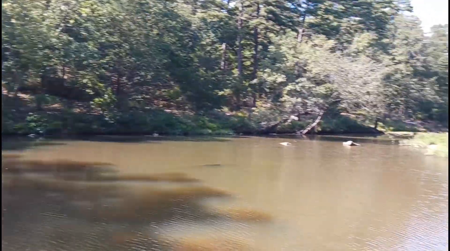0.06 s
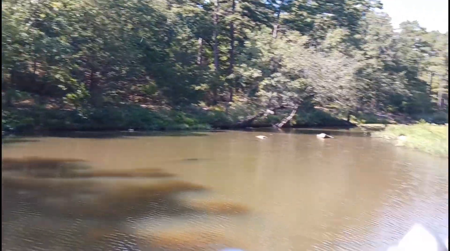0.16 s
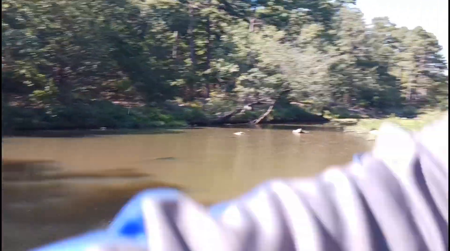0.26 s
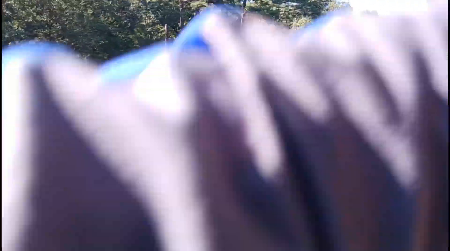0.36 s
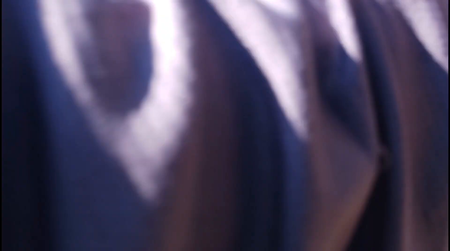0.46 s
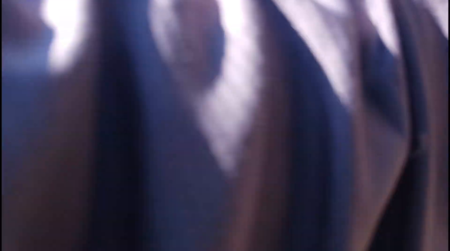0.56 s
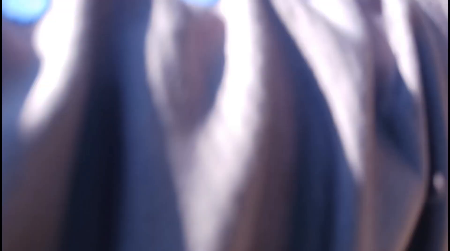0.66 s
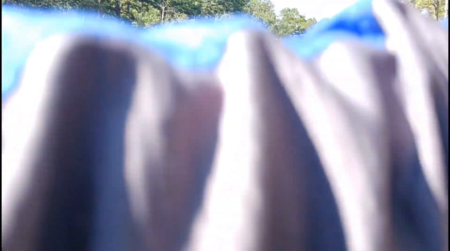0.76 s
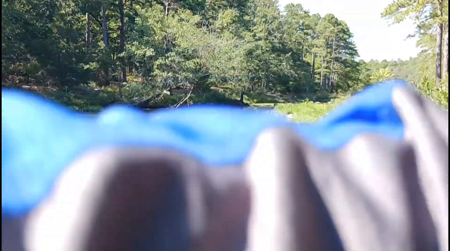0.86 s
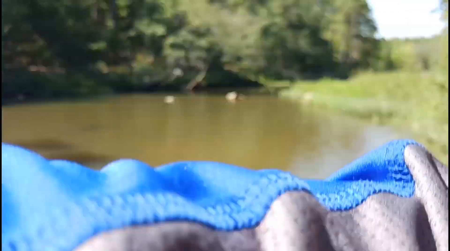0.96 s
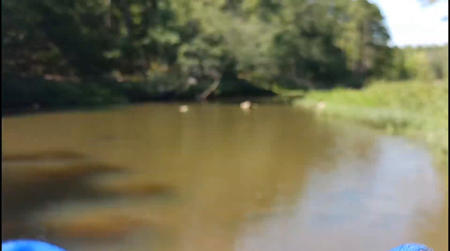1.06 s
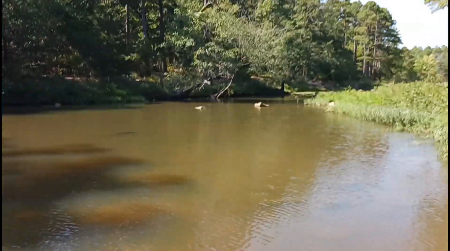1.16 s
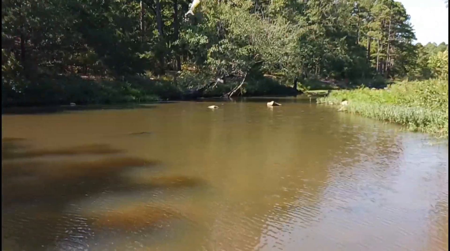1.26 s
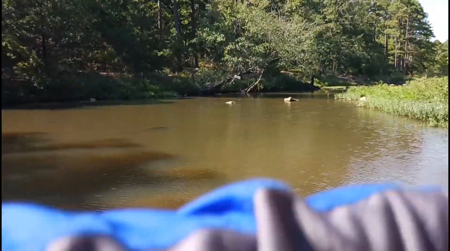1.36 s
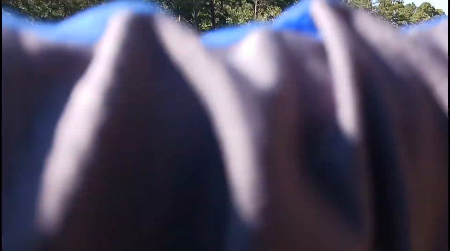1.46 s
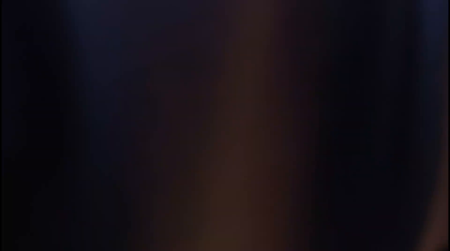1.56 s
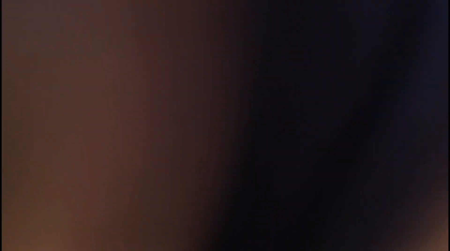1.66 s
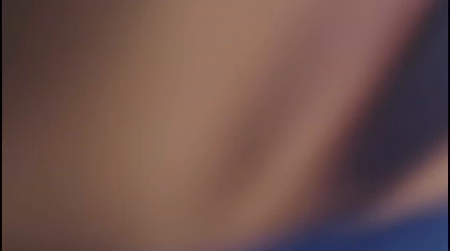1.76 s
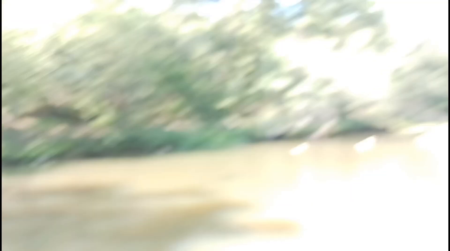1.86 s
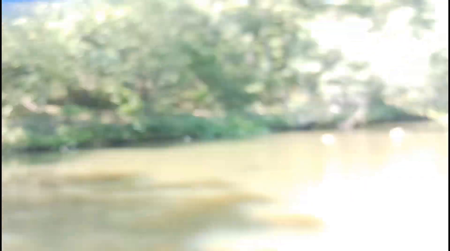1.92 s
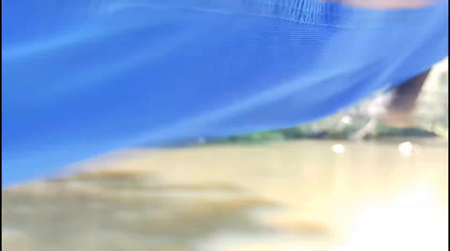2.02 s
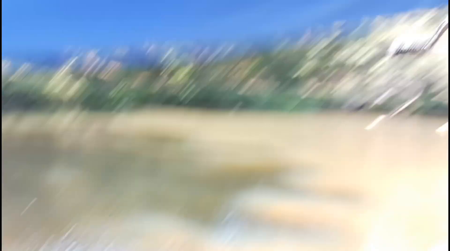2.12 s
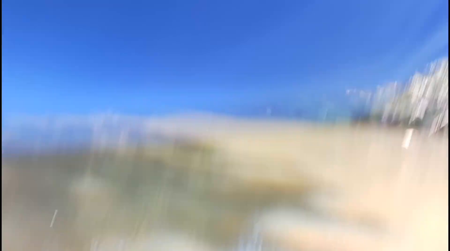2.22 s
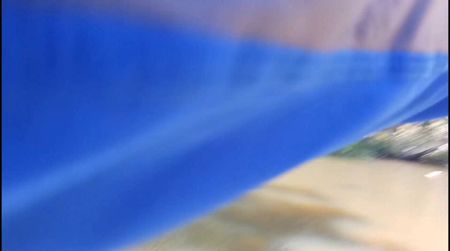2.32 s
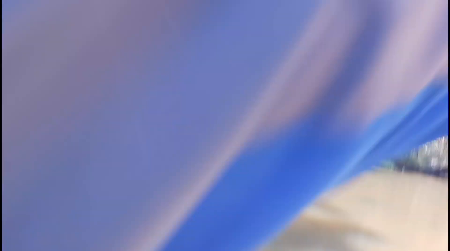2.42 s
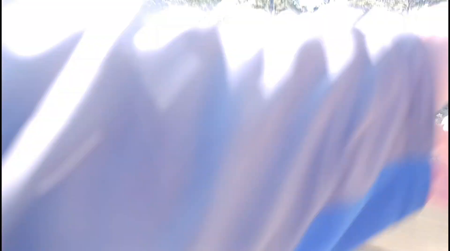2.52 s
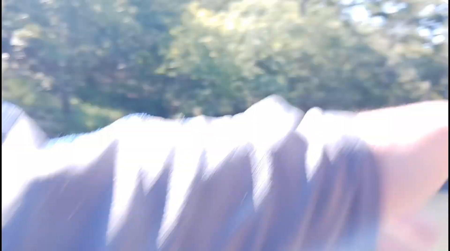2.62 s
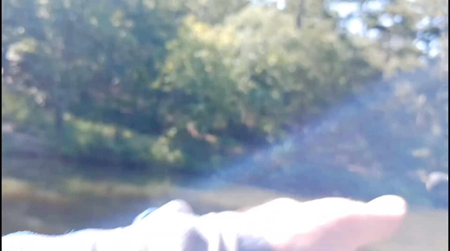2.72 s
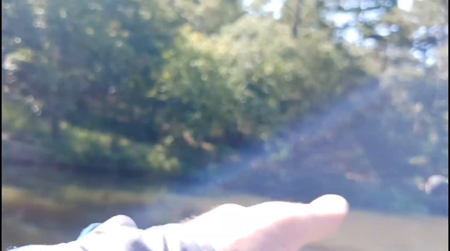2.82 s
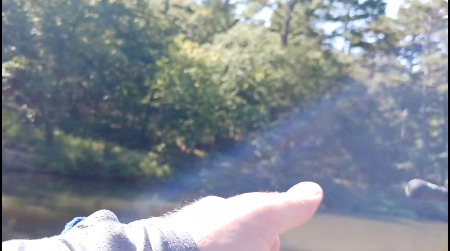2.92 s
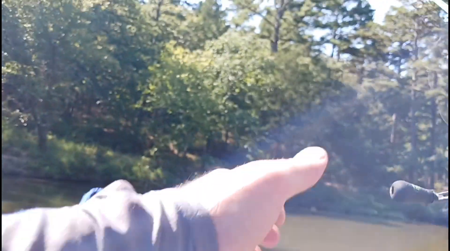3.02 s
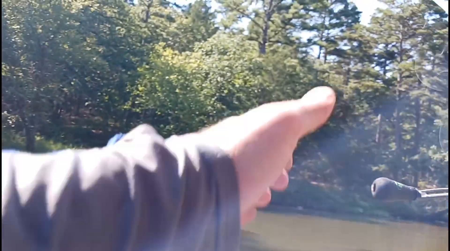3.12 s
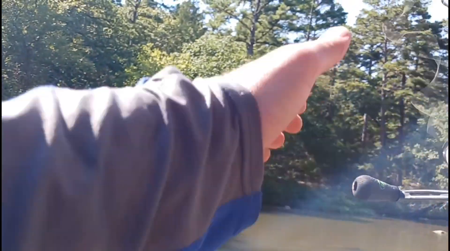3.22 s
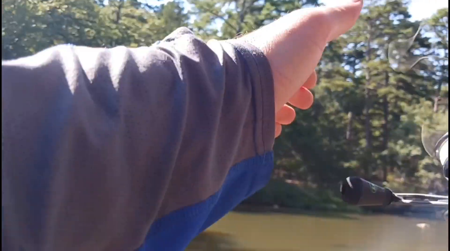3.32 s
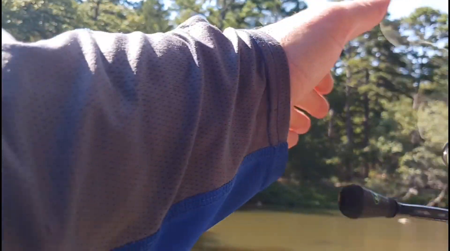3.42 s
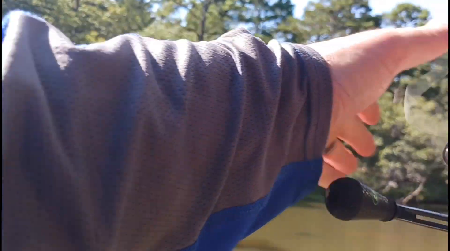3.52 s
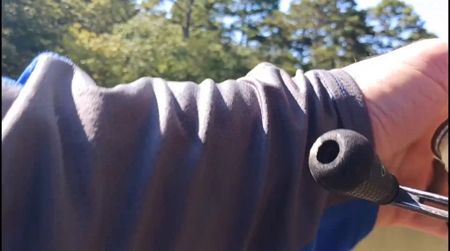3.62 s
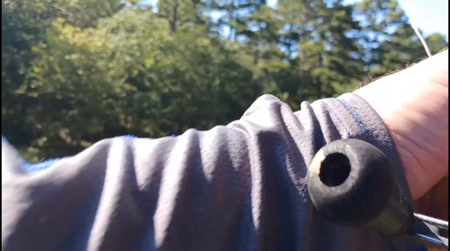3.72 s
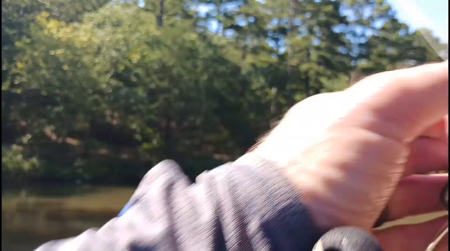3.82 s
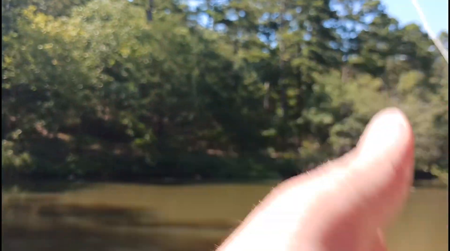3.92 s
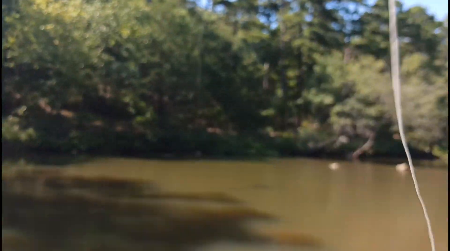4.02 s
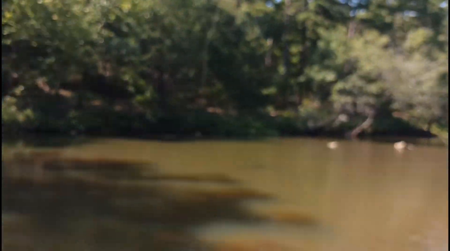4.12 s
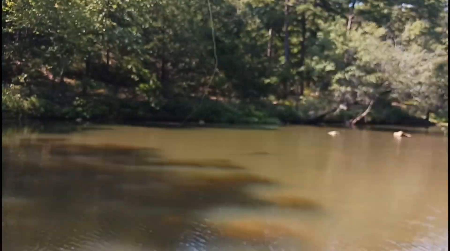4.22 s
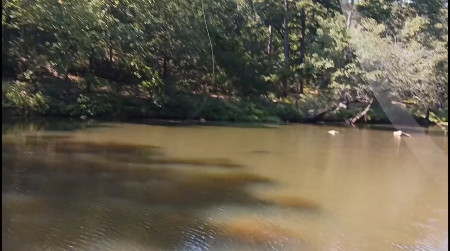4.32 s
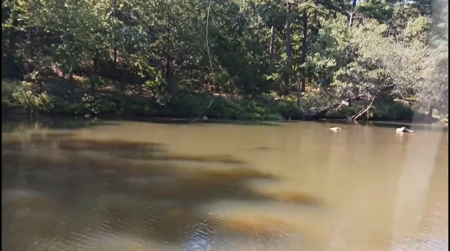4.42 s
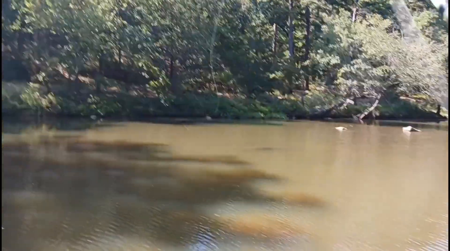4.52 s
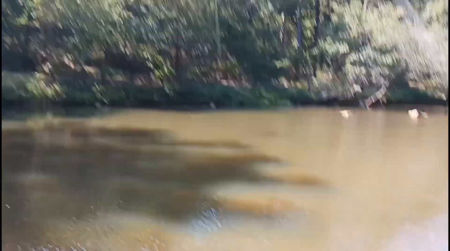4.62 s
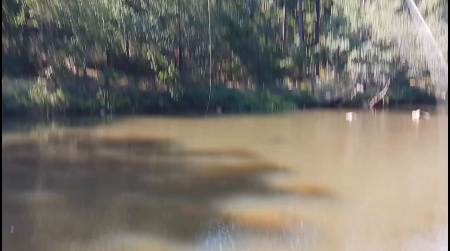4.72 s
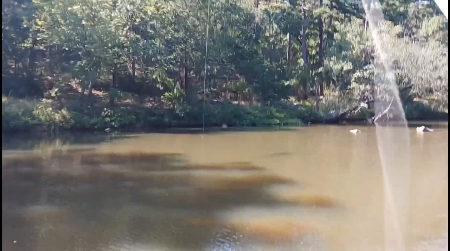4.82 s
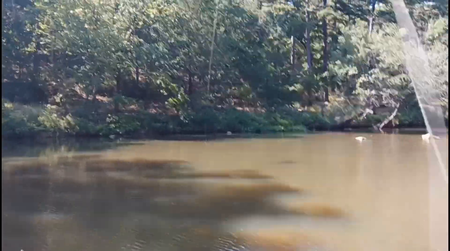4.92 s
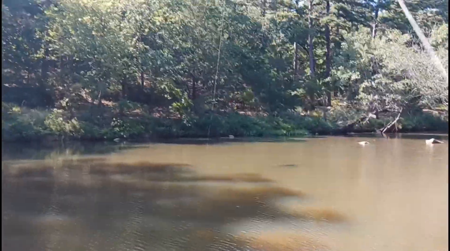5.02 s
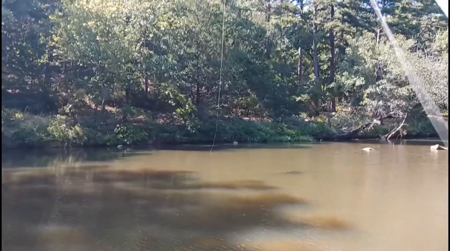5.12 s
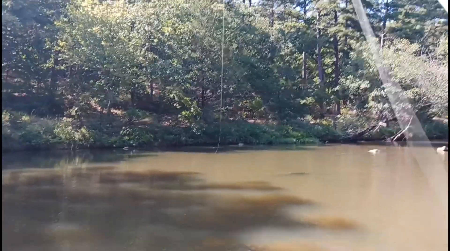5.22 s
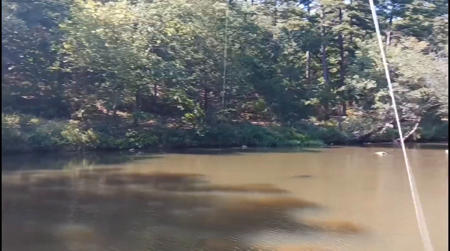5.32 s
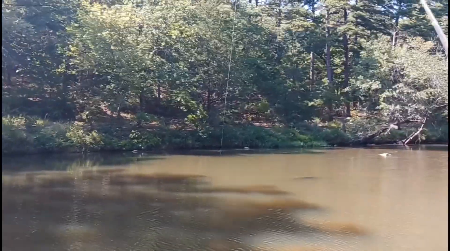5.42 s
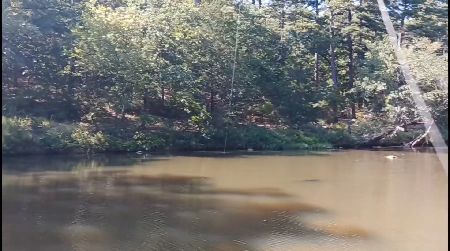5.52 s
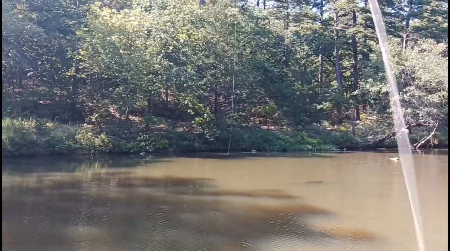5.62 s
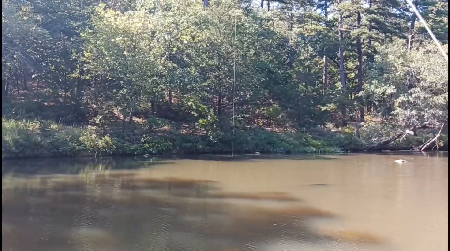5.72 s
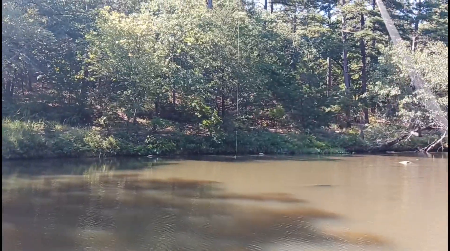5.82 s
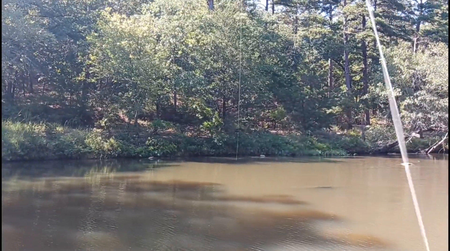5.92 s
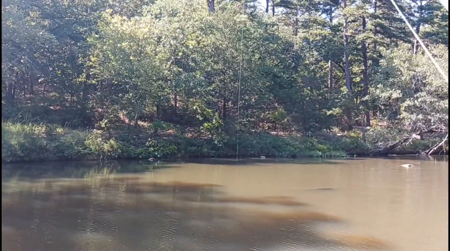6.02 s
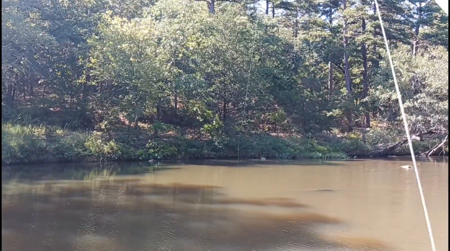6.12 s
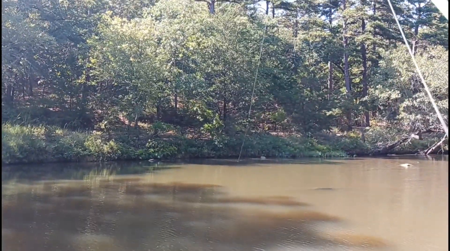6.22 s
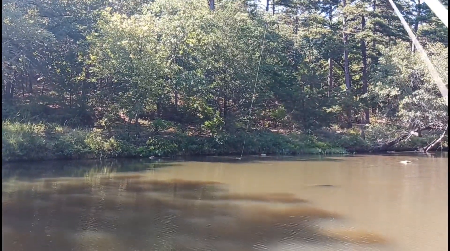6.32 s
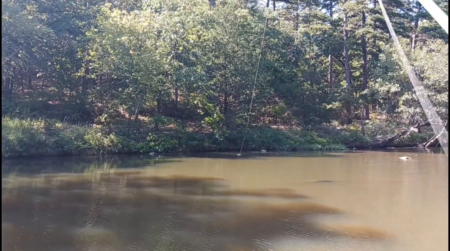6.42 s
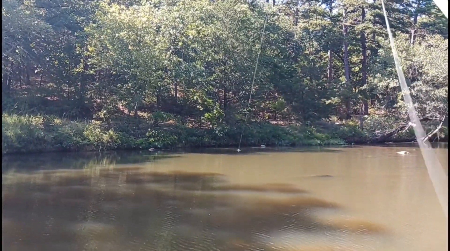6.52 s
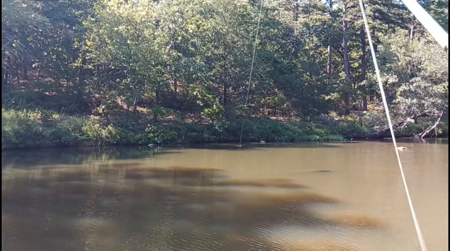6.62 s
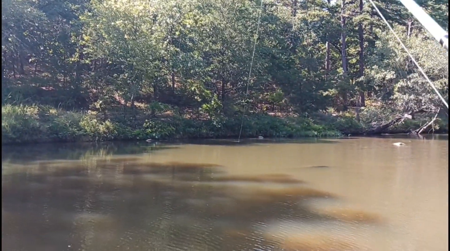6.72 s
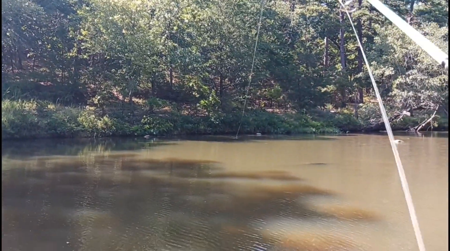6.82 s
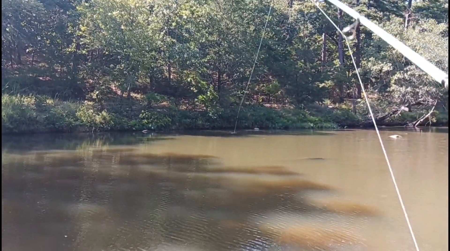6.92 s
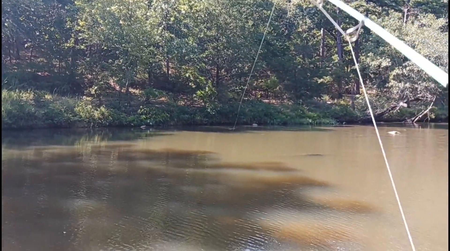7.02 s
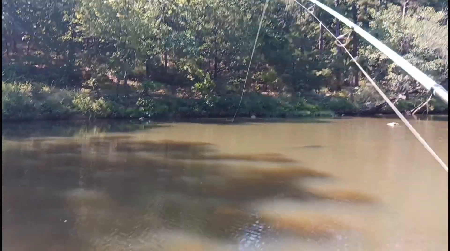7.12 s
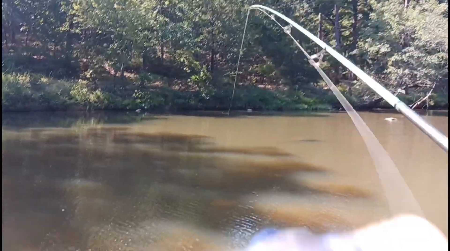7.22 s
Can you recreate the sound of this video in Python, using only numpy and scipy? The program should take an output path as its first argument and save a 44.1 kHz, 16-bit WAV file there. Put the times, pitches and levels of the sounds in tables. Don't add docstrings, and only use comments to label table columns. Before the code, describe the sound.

Very close, dry handling of a spinning rod: sharp metal clicks, a pause, a hard clack on the right, then a heavy sleeve rub on the left. The cast follows with low gusts, clattering line and ringing knocks, settling into airy hiss with a faint falling whistle. A crisp bail snap ends it; soft gear whirr, fabric rustle and irregular ticks continue over barely audible creek noise.

```python
import sys
import numpy as np
from scipy import signal
from scipy.fft import rfft, irfft, next_fast_len
from scipy.io import wavfile
from scipy.ndimage import uniform_filter1d, map_coordinates

SR = 44100
rng = np.random.default_rng(int(sys.argv[2]) if len(sys.argv) > 2 else 0)


def amplitude_ratio(level_db):
    exponent = np.asarray(level_db, float) / 20
    return 10 ** exponent


def master(y):
    cut = np.clip(np.atleast_2d(y).T, -1, 1)
    pcm = np.round(cut * 32767)
    wavfile.write(sys.argv[1], SR, pcm.astype(np.int16))


N = 320323

# frequency in Hz, density in dB per Hz.
CREEK_SPECTRUM = [(59, -28), (100, -14.5), (433, -20.5), (481, -17.5), (930, -25), (1280, -30),
                  (1610, -34.5), (10200, -26.5), (11900, -22), (16000, -25.5)]
CREEK_DB = -72

# frequency in Hz, density in dB per Hz.
WIND_SPECTRUM = [(12, -42.5), (20, -7.5), (70, 2.5), (95, -2), (197, -22), (500, -35.5), (650, -65.5),
                 (1100, -120)]
# time in s, peak in dB, rise in ms, fall in ms (each for 20 dB).
GUSTS = [(0.066, -56, 240, 202), (0.591, -66, 630, 261), (1.177, -49.5, 100, 60), (1.25, -62.5, 330, 502),
         (1.719, -33, 30, 300.5), (1.776, -26, 60, 123), (2.168, -24.5, 13.8, 37), (2.256, -35.5, 73, 46.5),
         (2.365, -37.5, 72, 50), (2.49, -34.5, 64, 122.5), (2.754, -56.5, 190, 1508), (3.105, -43, 88, 298),
         (3.165, -39, 200, 26), (3.312, -45, 51, 174), (3.569, -43.5, 37, 397), (3.718, -36.5, 160, 86.5),
         (3.95, -63, 100, 226.5), (4.16, -36, 89, 56), (4.279, -49.5, 39, 62), (4.484, -38, 47.3, 45),
         (4.597, -47, 39, 141.5), (4.816, -45, 150, 73), (5.108, -61.5, 85, 392)]
CALM_DB = -70.5

# frequency in Hz, density in dB per Hz.
RUSTLE_SPECTRUM = [(120, -31.5), (200, -18), (409, -10.5), (1230, -12.5), (2330, -10), (2800, -12),
                   (3560, -7), (9930, -11), (14900, -9), (16000, -22.5)]
# time in s, peak in dB, rise in ms, fall in ms, left over right in dB.
FABRIC_RUBS = [(0.1, -61, 230, 420, 0.5), (0.29, -61.5, 80, 82, -2), (0.446, -62.5, 90, 300, 5),
               (0.862, -52.5, 123, 93, -3.5), (0.95, -76, 150, 970, -0.5), (1.1, -60, 220, 293, -4),
               (1.3, -79, 340, 140, 7), (1.66, -64, 190, 170, 14.5), (3.775, -58.5, 27, 230, -0.5),
               (3.968, -43, 24, 26.4, 0.5), (4.17, -60, 490, 300, 1.5), (4.314, -50.5, 160, 147, -1.5),
               (4.586, -56.5, 89, 1600, -2.5), (4.889, -51.5, 590, 218, 2), (5.432, -62, 1600, 353, 1),
               (5.879, -65.5, 1100, 230, -0.5), (6.23, -65, 1600, 270, -3), (6.666, -52, 148, 200, 0.2),
               (6.55, -58.5, 270, 180, -1.5), (6.804, -65.5, 150, 270, 4), (7.032, -67, 189, 35, -3),
               (7.25, -54.5, 69, 65, -2)]
STILL_DB = -79
GRIP_DB, GRIP_LEAD, GRIP_FALL_MS, GRIP_PAN = -21.5, 1.514, 16.5, 0.35

# time in s, pressure as rumble in dB, speed as scratch in dB.
SLEEVE_DRAG = [
    (1.692, -42, -63),
    (1.707, -21, -30.5),
    (1.763, -17, -31.5),
    (1.779, -24.5, -24),
    (1.796, -42.5, -48),
    (1.834, -29, -45.5),
    (1.854, -26.5, -33.5),
    (1.869, -22, -25.5),
    (1.93, -56, -62),
]
# frequency in Hz, density in dB per Hz.
RUMBLE_SPECTRUM = [(35, -35), (60, -6.5), (268, -4.5), (525, -8.5), (826, -15), (2500, -27.5), (3250, -46),
                   (5500, -120)]
# frequency in Hz, density in dB per Hz.
SCRATCH_SPECTRUM = [(880, -31), (1500, -3.5), (3450, -5), (6500, -10), (12600, -9.5), (16000, -9.5)]
FAR_S, FAR_HOLD_S, FAR_EDGE_S, FAR_DB = 1.782, 0.072, 0.03, -65.5

# time in s, peak in dB, frequency in Hz, 60 dB decay in s, left over right in dB.
KNOCKS_AND_BLOWS = [(0.4462, -39, 3450, 0.022, -2), (0.452, -44, 3400, 0.019, -2), (1.117, -35.5, 245, 0.0193, -0.5),
                    (1.1207, -8.5, 464, 0.0043, -23), (1.124, -29, 189, 0.0307, -21.5), (1.55, -51, 910, 0.0076, 6.5),
                    (2.162, -28.5, 130, 0.042, 25), (2.1701, -22.5, 64.6, 0.13, 27), (2.349, -36, 179, 0.05, 27),
                    (2.4317, -18, 4550, .02, 4), (2.4473, -23.5, 2356, 0.039, 7), (2.462, -31.5, 60.5, 0.11, 22.5),
                    (4.579, -36, 224, 0.023, 2), (5.095, -40.5, 220.3, 0.023, 3.5)]

# time in s, peak in dB, rise in ms, fall in ms.
CRANK_PUSHES = [(4.8, -58, 153, 253), (4.91, -54, 270, 120), (5.06, -60, 100, 380),
                (5.311, -59.5, 250, 1270), (5.751, -63, 153, 380), (6.197, -65.5, 480, 302),
                (6.489, -61.5, 94, 350), (6.686, -55, 97, 210), (6.815, -57, 360, 110),
                (6.968, -62, 120, 53), (7.26, -49.5, 39, 44)]
# frequency in Hz, width in Hz, level in dB.
GEARBOX_MODES = [(743, 80, -15), (2270, 130, -1.5), (2525, 380, -5.5), (3430, 320, -5.5), (3060, 2000, -2)]
# time in s, frequency in Hz, level in dB.
SHELL_MODE = [(4.55, 1700, -9), (4.79, 1920, 2.5), (4.83, 1583, 3.5), (4.9, 1624, -2), (4.95, 1930, 5.5),
              (5.03, 1618, 2.5), (5.2, 1655, -5.5), (7.0, 1687, -7), (7.2, 1864, 1.5)]
# time in s, peak in dB, rise in ms, fall in ms.
CORK_SQUEEZES = [
    (4.82, -79.5, 73, 74),
    (6.54, -67, 140, 190),
    (6.7, -74, 200, 160),
]
CORK_HZ, THROB_DB = 402, 2.5

# time in s, speed as hiss in dB, slack as guide rattle in dB.
PAYOUT = [
    (1.93, -65.5, -65.5),
    (2.1, -59.5, -49),
    (2.12, -45.5, -43.5),
    (2.4, -47.5, -42.5),
    (2.71, -50, -53),
    (2.9, -51.5, -65.5),
    (3.44, -51, -65.5),
    (3.63, -52.5, -57),
    (3.77, -72.5, -58.5),
]
# time in s, peak in dB, rise in ms, fall in ms, left over right in dB.
LOOP_SLAPS = [
    (2.123, -44.5, 40, 23.6, 8),
    (2.152, -31.5, 36, 32, 1),
    (2.408, -43, 67, 52, 23),
    (2.443, -30, 18, 32, 4),
    (3.471, -51.5, 36, 158, -1.5),
]
SLAP_HISS_DB, SPOOL_PAN_DB = -17, 1.5
# time in s, frequency in Hz, level in dB.
COIL_WHISTLE = [(2.9, 8700, -72), (3.0, 8400, -63), (3.17, 7900, -61), (3.35, 7000, -68), (3.5, 5600, -72),
                (3.6, 4500, -63), (3.66, 3800, -64), (3.72, 3400, -72)]
# frequency in Hz, width in Hz, level in dB.
SPOOL_MODES = [(4670, 300, -8), (5680, 60, 5), (8580, 90, -7), (12300, 150, -2), (13300, 300, -6)]
# frequency in Hz, density in dB per Hz.
HISS_SPECTRUM = [(880, -67), (1500, -57), (2250, -17), (3030, -25.5), (3590, -17), (8320, -4), (9370, -8.5),
                 (12700, 0.5), (16000, -6)]
# frequency in Hz, density in dB per Hz.
RATTLE_SPECTRUM = [(180, -23.5), (300, -8), (900, -12.5), (1730, -8.5), (2250, -8), (2800, -12.5),
                   (3570, -2.5), (5200, -3.5), (9000, -16.5), (11700, -59), (19800, -120)]

# frequency in Hz, width in Hz, level in dB.
BODY_MODES = [(1812, 42, 7.5), (2370, 220, 5.5), (3541, 80, 6.5), (4480, 58, -19), (5650, 110, 2)]
# time in s, peak in dB, frequency in Hz, left over right in dB.
SETTING = [(0.1339, -20, 7060, 1), (0.1391, -18, 12100, -12), (0.1471, -25.5, 12600, -3),
           (0.1529, -44.5, 12600, -0.5), (0.1657, -31.5, 7260, -14), (0.2402, -32.5, 7100, -13),
           (0.2496, -36.5, 7400, -11), (0.2575, -33.5, 5440, -1.5), (0.3282, -41.5, 3710, -23),
           (0.3317, -33.5, 11500, -8.0), (0.339, -38, 4830, -11.5), (0.3704, -27.5, 3430, -1),
           (0.4467, -36.5, 3460, -2), (0.4523, -43, 3420, -10), (1.118, -30, 4470, -24.5),
           (1.1219, -21.5, 4870, -19.5), (1.1369, -23.5, 2850, -16.0), (1.1463, -16.5, 4245, -17),
           (1.162, -32, 4084, -14), (1.4411, -56, 11900, 14), (1.622, -48, 6990, 0.5),
           (1.763, -20, 2660, 19)]
# time in s, peak in dB, frequency in Hz, left over right in dB.
FLYING = [(2.1162, -29, 5800, 1), (2.1413, -23.5, 4510, -4), (2.1479, -25.5, 2390, 5.5),
          (2.1579, -28, 4660, 1), (2.1987, -33, 4630, -3.5), (2.2438, -30, 3760, -4),
          (2.2534, -31.5, 3460, -6), (2.2951, -31.5, 4430, -8), (2.3079, -33.5, 4380, 0),
          (2.324, -33, 3460, 2), (2.3491, -32, 4520, 0), (2.355, -25.5, 4140, -8),
          (2.4006, -25.5, 4530, -2.5), (2.4321, -19, 4670, 1), (2.4358, -18, 4660, -2),
          (2.4402, -15, 4430, -3.5), (2.4483, -20.5, 2288, 1.5), (2.7473, -39, 11020, 1),
          (3.2275, -42, 12300, 3.5), (3.464, -32, 6250, 3.5), (3.4773, -39, 8600, 10),
          (3.5677, -40, 12500, 3.5)]
# time in s, peak in dB, frequency in Hz, left over right in dB.
CLOSING = [(3.7653, -44, 12400, -1), (3.7834, -47, 3930, -11), (3.8003, -46, 4700, -2.5),
           (3.8203, -47, 2180, -13), (3.8984, -22.5, 12750, 7), (3.9075, -29, 11140, -23),
           (3.9141, -27.5, 4520, 0.5), (3.919, -22, 5170, 2), (3.9456, -29, 8020, 1),
           (4.0615, -37.5, 5020, -1), (4.077, -33, 4500, -3), (4.0885, -29, 12860, -4),
           (4.2049, -51, 12600, 0.5), (4.2459, -44, 12890, 3), (4.3783, -43, 5050, 3.5),
           (4.5176, -45.5, 12900, 2.5)]
# time in s, peak in dB, frequency in Hz, left over right in dB.
TICKING = [(5.3009, -42, 2260, -4), (5.4214, -41.5, 3460, 2), (5.5948, -45, 2360, -5),
           (5.6051, -42.5, 2260, -1.0), (5.7981, -39.5, 4480, 1.0), (6.0556, -41, 2270, -2.0),
           (6.14, -32, 6950, -3), (6.219, -39.5, 9310, -4), (6.2374, -39.5, 3430, 0),
           (6.4821, -36, 3740, 11), (6.49, -28.5, 5600, -3.5), (6.517, -37.5, 4140, 2.5),
           (6.5339, -50, 3450, 1.0), (6.6018, -30, 4430, 2.0), (6.6569, -31.5, 3680, 6),
           (6.6898, -32, 4050, 3), (6.7056, -32, 2410, 6), (6.7865, -38.5, 4000, 1),
           (6.8035, -30.5, 2280, 1), (6.962, -35, 6500, -2), (6.9856, -28.5, 4150, -1)]
# time in s, peak in dB, frequency in Hz, left over right in dB, length in ms.
CRUNCHES = [
    (0.1175, -41, 9040, -3, 13.3),
    (0.1323, -24, 6350, -16, 28),
    (2.1255, -31, 4940, -14.5, 12),
    (2.4096, -28.5, 5060, 6.5, 11),
    (3.9293, -17.5, 6550, -10, 19),
    (4.586, -49.5, 12700, 14, 32),
]
SETTING_MS, FLYING_MS, CLOSING_MS, TICKING_MS = 2.5, 4.6, 3.6, 2.15
STRIKE = 1.55

LAG = 10
TURN = 1.4
DIP_HZ, DIP_WIDTH_HZ, DIP_DB = 2910, 247, -3
TOP_HZ = 15886


def unit(x):
    return x / np.sqrt(np.mean(x ** 2) + 1e-20)


def curves(table):
    s, *columns = np.transpose(table)
    t = np.arange(N) / SR
    gate = np.clip(np.minimum(t - s[0], s[-1] - t) / 0.0059 + 1, 0, 1)
    return [gate] + [np.interp(t, s, c) for c in columns]


def wobble(rate):
    at = np.arange(0, N, max(1, int(SR / rate) // 8))
    knots = rng.standard_normal(int(N * rate / SR) + 4)
    return np.interp(np.arange(N), at, map_coordinates(knots, [at * rate / SR]))


def filtered(x, response):
    m = next_fast_len(N + 8192)
    return irfft(rfft(x, m) * response(np.fft.rfftfreq(m, 1 / SR)), m)[..., :N]


def colour(points):
    f, db = np.transpose(points)
    return lambda hz: amplitude_ratio(np.interp(np.log(hz + 1), np.log(f + 1), db))


def resonances(modes):
    def response(f):
        total = 0
        for k, (centre, width, db) in enumerate(modes):
            damping = 1j * f * width
            total = total + (-1) ** k * amplitude_ratio(db) * damping / (centre * centre - f * f + damping)
        return total
    return response


def grainy(response, alike, grain_db, rate):
    source, own = rng.standard_normal(N), rng.standard_normal((2, N))
    share = np.clip(alike, 0, 1)
    detour = np.round(30 + 9 * wobble(4) * [[1], [-1]]).astype(int)
    direct = np.array([np.roll(source, LAG), source])
    shared = direct + 0.7 * source[(np.arange(N) - detour) % N]
    pair = np.sqrt(share) * shared + np.sqrt(1 - share) * own
    return unit(filtered(pair * amplitude_ratio(grain_db * wobble(rate)), response))


def placed(pan_db):
    left = 1 / (1 + amplitude_ratio(-np.asarray(pan_db)) ** 2)
    return np.sqrt(2 * np.array([left, 1 - left]))


def fuzzy(hz, width):
    phase = 2 * np.pi * np.cumsum(hz * np.ones(N)) / SR + [[TURN], [0]]
    return wobble(width) * np.sin(phase) + wobble(width) * np.cos(phase)


def swells(rows, rest_db, rest_pan_db=0):
    at = np.arange(0, N, 64)
    s, db, rise, fall, *pan_db = np.transpose(rows)[:, :, None]
    late_ms = 1000 * (at / SR - s)
    power = amplitude_ratio(2 * db - 2 * 20 * np.maximum(-late_ms / rise, late_ms / fall))
    rest = amplitude_ratio(2 * rest_db)
    total = power.sum(0) + rest
    side_db = ((power * sum(pan_db)).sum(0) + rest * rest_pan_db) / total
    return [np.interp(np.arange(N), at, c) for c in (10 * np.log10(total), side_db)]


def power_sum_db(a_db, b_db):
    return 10 * np.log10(amplitude_ratio(2 * a_db) + amplitude_ratio(2 * b_db))


def streaky(x, depth_db):
    z = signal.stft(x, nperseg=512)[2]
    field = uniform_filter1d(rng.standard_normal(z.shape[1:]), size=5, axis=0)
    field = uniform_filter1d(field, size=24, axis=1)
    return unit(signal.istft(z * amplitude_ratio(depth_db * unit(field)), nperseg=512)[1][:, :N])


def contacts():
    groups = [(SETTING, SETTING_MS), (FLYING, FLYING_MS), (CLOSING, CLOSING_MS), (TICKING, TICKING_MS)]
    return [(*row, ms) for rows, ms in groups for row in rows] + list(CRUNCHES)


def creek():
    return amplitude_ratio(CREEK_DB + 1.23) * grainy(colour(CREEK_SPECTRUM), alike=0.11, grain_db=2.0, rate=31)


def wind():
    db = swells(GUSTS, CALM_DB)[0]
    lumps = grainy(colour(WIND_SPECTRUM), alike=0, grain_db=3.5, rate=30)
    swing = np.sin(2 * np.pi * np.cumsum(60 * (1 + 0.1658 * wobble(12))) / SR)
    left = amplitude_ratio(db - 0.06) * (0.65 * swing + 0.69 * lumps[0])
    right = amplitude_ratio(0.38 * db - 58) * lumps[1]
    return np.array([left, right])


def fabric():
    grips = []
    for s, db, _, pan_db, ms in contacts():
        if not PAYOUT[0][0] < s < FLYING[-1][0] + 0.01:
            grips.append((s, db + GRIP_DB, GRIP_LEAD * ms, GRIP_FALL_MS, GRIP_PAN * pan_db))
    db, pan_db = swells(list(FABRIC_RUBS) + grips, STILL_DB, rest_pan_db=14.5)
    rustle = grainy(colour(RUSTLE_SPECTRUM), alike=0.088, grain_db=2.0, rate=150)
    return amplitude_ratio(db - 1.98) * placed(pan_db) * rustle


def sleeve():
    gate, rumble_db, scratch_db = curves(SLEEVE_DRAG)
    away_s = np.abs(np.arange(N) / SR - FAR_S)
    far_db = FAR_DB - 20 * np.maximum(away_s - FAR_HOLD_S, 0) / FAR_EDGE_S
    rumble = grainy(colour(RUMBLE_SPECTRUM), alike=0.037, grain_db=2.0, rate=90)
    scratch = grainy(colour(SCRATCH_SPECTRUM), alike=0.17, grain_db=2.0, rate=91)
    rumble = amplitude_ratio(rumble_db + [[-0.7], [-30]]) * rumble
    scratch = amplitude_ratio(np.array([scratch_db, far_db]) - 1.0) * scratch
    return gate * (rumble + scratch)


def thumps():
    out, t = np.zeros((2, N + SR)), np.arange(SR // 4) / SR
    glide = 1 + 0.31 * np.exp(-t / 0.002)
    onset = 1 - np.exp(-t / 0.00094)
    for s, db, hz, t60, pan_db in KNOCKS_AND_BLOWS:
        swing = amplitude_ratio(db - 60 * t / t60) * np.sin(2 * np.pi * hz * t * glide) * onset
        out[:, round(s * SR):][:, :len(t)] += 1.327 * placed(pan_db)[:, None] * swing
    return out[:, :N]


def winding():
    db = swells(CRANK_PUSHES, rest_db=-110)[0]
    _, shell_hz, shell_db = curves(SHELL_MODE)
    turns = np.cumsum(7.5 + 0.8 * wobble(2.5)) / SR
    whirr = amplitude_ratio(shell_db + 3.9 * wobble(25)) * fuzzy(shell_hz * (1 + 0.015 * wobble(20)), 230)
    for hz, width, mode_db in GEARBOX_MODES:
        whirr += amplitude_ratio(mode_db + 3 * wobble(14)) * fuzzy(hz * (1 + 0.018 * wobble(12)), width)
    cork_db = swells(CORK_SQUEEZES, rest_db=-110)[0]
    cork = amplitude_ratio(cork_db + 4.5 * wobble(60)) * fuzzy(CORK_HZ, 350)
    return amplitude_ratio(db - 5.5 + THROB_DB * np.sin(2 * np.pi * turns)) * whirr + cork


def line():
    gate, speed_db, slack_db = curves(PAYOUT)
    slap_db, slap_pan_db = swells(LOOP_SLAPS, rest_db=-76.5)
    hiss_db = power_sum_db(speed_db, slap_db + SLAP_HISS_DB)
    rattle_db = power_sum_db(slack_db, slap_db)
    pan_db = SPOOL_PAN_DB + amplitude_ratio(2 * (slap_db - rattle_db)) * (slap_pan_db - SPOOL_PAN_DB)
    hiss = grainy(colour(HISS_SPECTRUM), alike=0.065, grain_db=1.5, rate=160)
    hiss = streaky(hiss, depth_db=3.0) * amplitude_ratio(0.87 * wobble(36))
    lip = amplitude_ratio(-14) * grainy(resonances(SPOOL_MODES), alike=0.54, grain_db=9, rate=15)
    rattle = grainy(colour(RATTLE_SPECTRUM), alike=0.11, grain_db=2, rate=170)
    jolt = grainy(resonances(BODY_MODES), alike=0.17, grain_db=-3.0, rate=95)
    jolt = amplitude_ratio(0.5 * (slap_db + 43.0)) * jolt
    on, hz, db = curves(COIL_WHISTLE)
    whistle = on * amplitude_ratio(db + 5.6 * wobble(30)) * fuzzy(hz * (1 + 0.028 * wobble(20)), 900)
    brushing = amplitude_ratio(hiss_db + 1.5) * (hiss + lip)
    slapping = amplitude_ratio(rattle_db - 6.0) * (rattle + jolt)
    return gate * placed(pan_db) * (brushing + slapping) + whistle


def clicks():
    own, body = np.zeros((2, 2, N + SR))
    lead = 300
    t = np.arange(-lead, 1000) / SR
    for s, db, hz, pan_db, ms in contacts():
        shape = np.exp(-np.where(t < 0, -t / 0.11, t / 0.3) / (ms / 1000))
        crack, scatter = shape * rng.standard_normal((2, len(t)))
        crack[lead] += STRIKE
        ring = signal.lfilter(*signal.iirpeak(np.clip(hz, 500, 15000), 5, SR), crack)
        dulling = signal.butter(2, np.clip(3.9 * hz, 500, 20000), fs=SR)
        snap, scatter = signal.lfilter(*dulling, [crack, scatter])
        for ear, gain in enumerate(amplitude_ratio(db + 0.85) * placed(pan_db)):
            start = round(s * SR) + LAG * (1 - ear)
            at = slice(start, start + len(t))
            own[ear, at] += gain * (2.0 * ring + 0.11 * snap + 0.38 * scatter * (1 - 2 * ear))
            body[ear, at] += gain * crack
    bright = signal.lfilter(*signal.butter(2, 1500, "high", fs=SR), own)
    ringing = resonances(list(BODY_MODES) + [(640, 420, -30.5)])
    return bright[:, lead:lead + N] + amplitude_ratio(-9) * filtered(body[:, lead:lead + N], ringing)


def scene():
    surroundings = creek() + wind() + fabric() + sleeve()
    tackle = thumps() + winding() + line() + clicks()
    return surroundings + tackle


def band_limit(x):
    return signal.sosfilt(signal.butter(12, 16650, fs=SR, output="sos"), x)


def record(dry):
    def response(hz):
        dip = amplitude_ratio(DIP_DB * np.exp(-((hz - DIP_HZ) / DIP_WIDTH_HZ) ** 2))
        top = 1 / (1 + (hz / TOP_HZ) ** 120) + 0.035 * (hz < 16500)
        return dip * top
    mix = filtered(dry, response)
    return band_limit(mix)


dry = scene()
out = record(dry)
master(out)
```